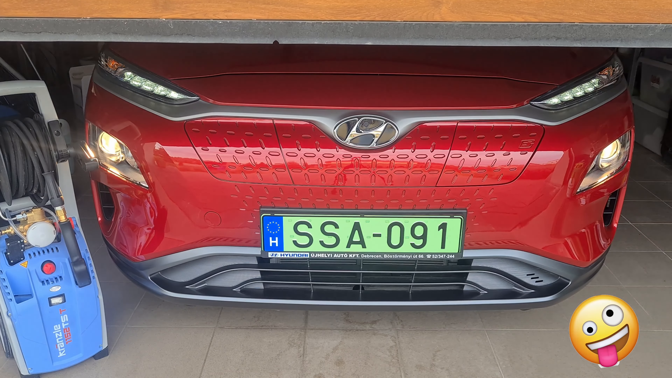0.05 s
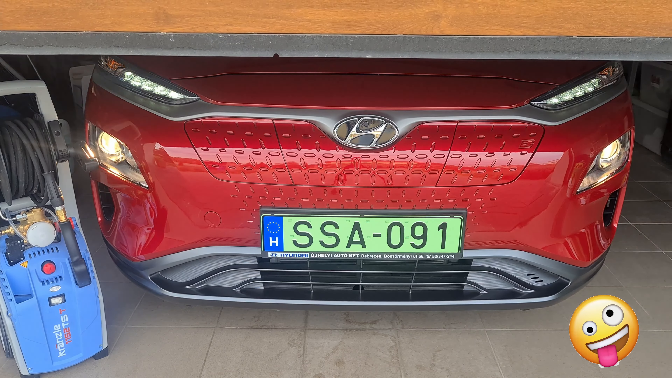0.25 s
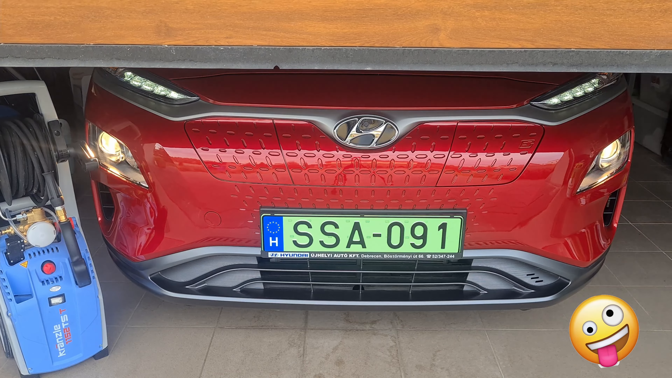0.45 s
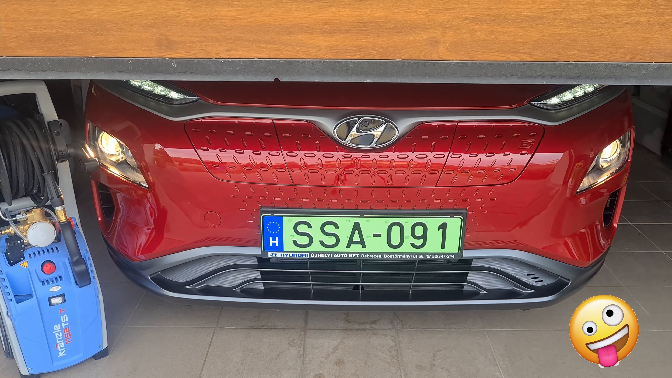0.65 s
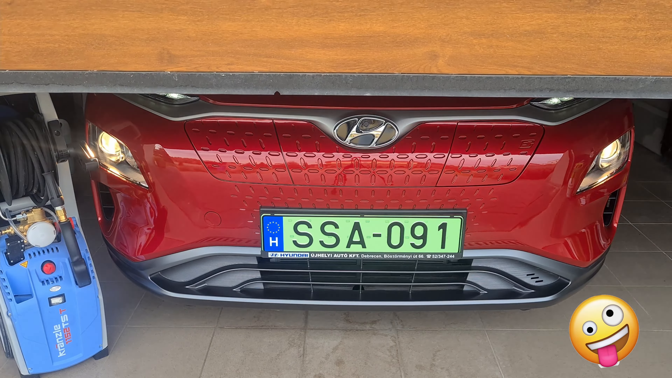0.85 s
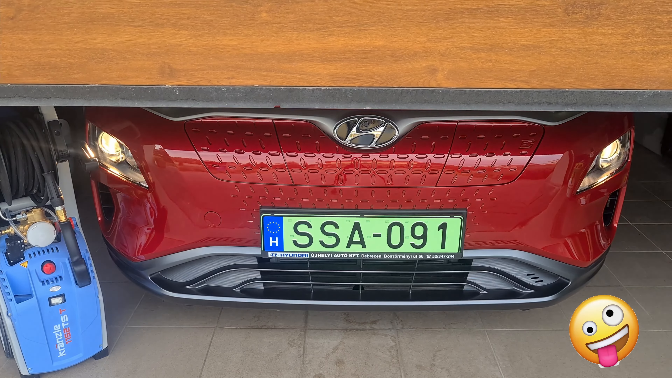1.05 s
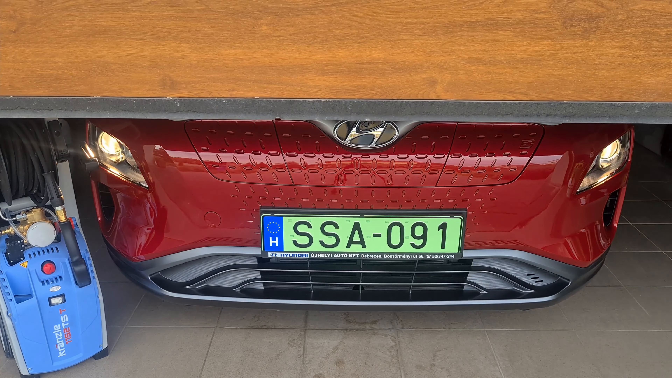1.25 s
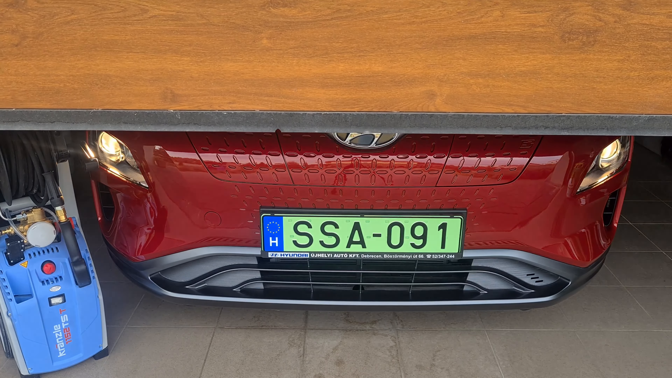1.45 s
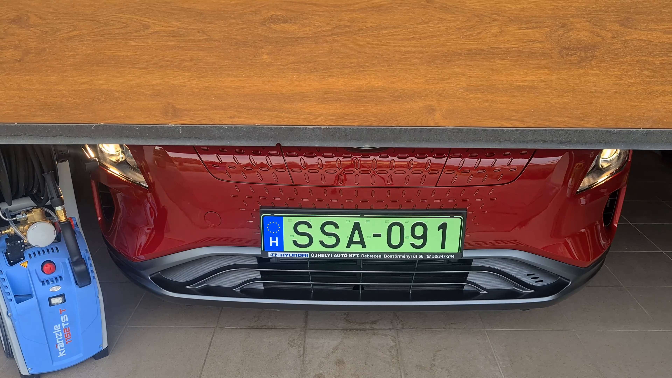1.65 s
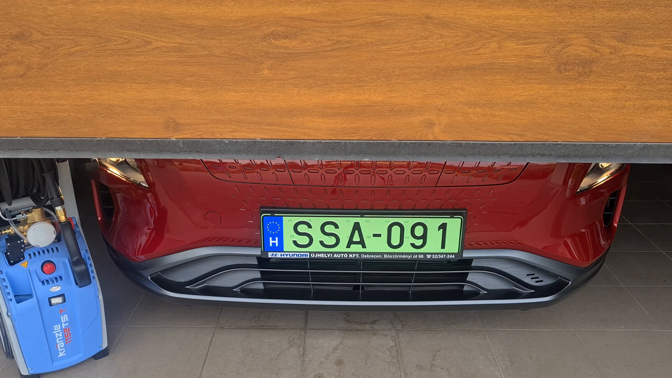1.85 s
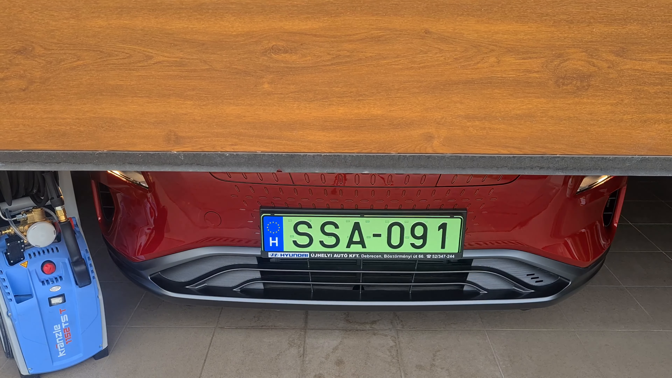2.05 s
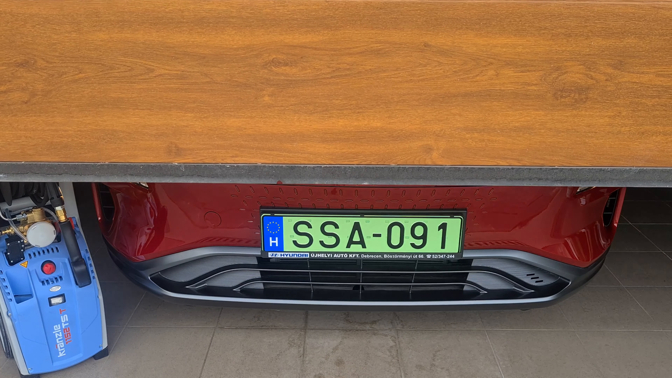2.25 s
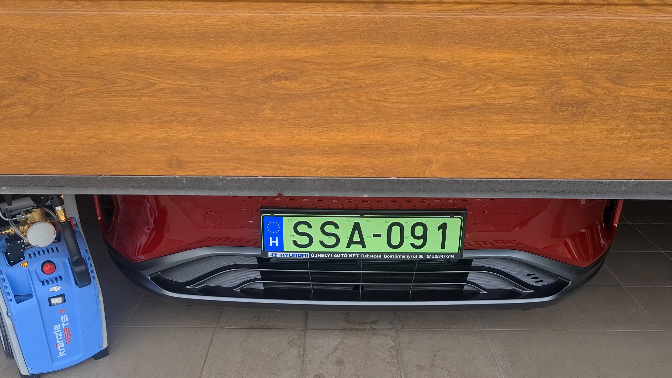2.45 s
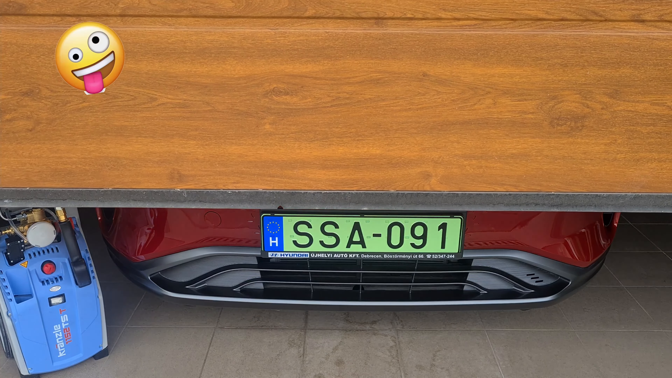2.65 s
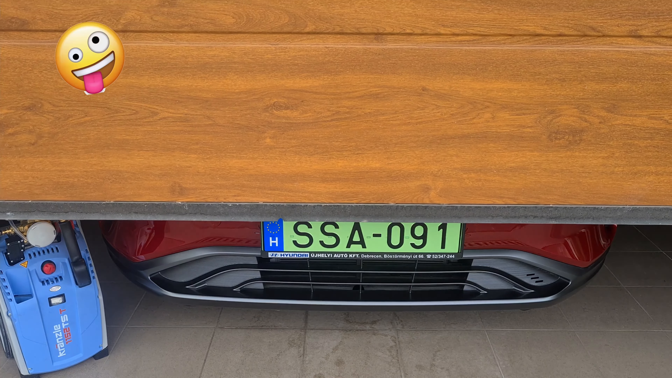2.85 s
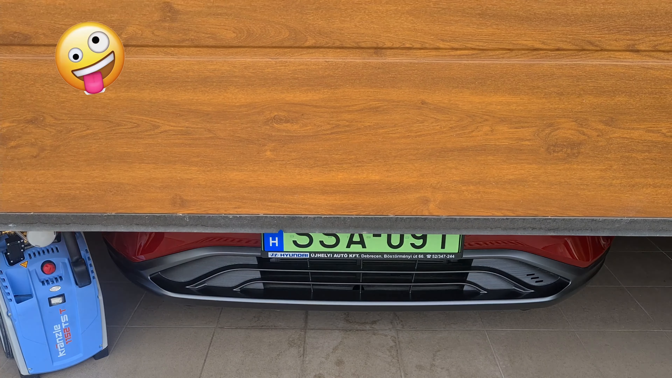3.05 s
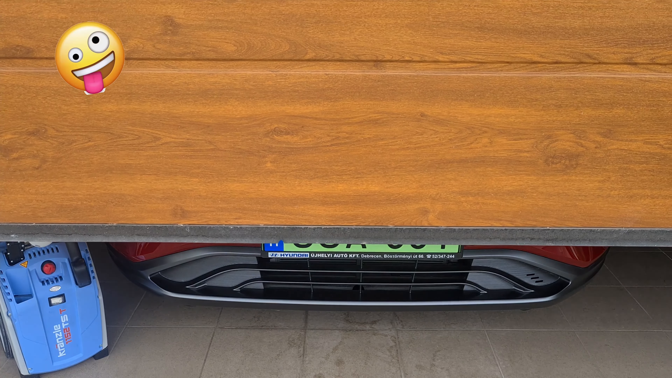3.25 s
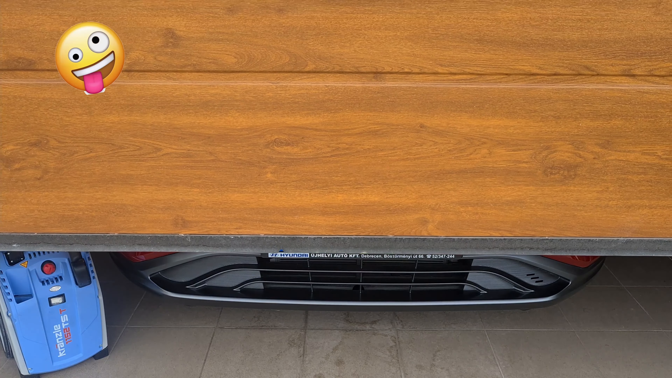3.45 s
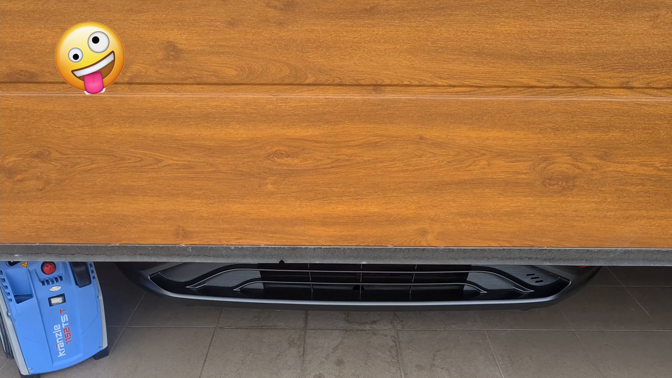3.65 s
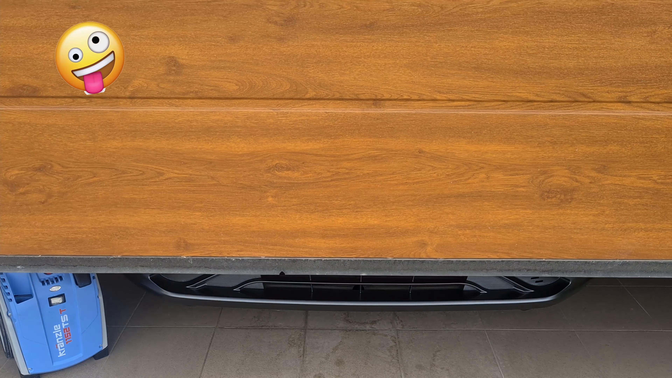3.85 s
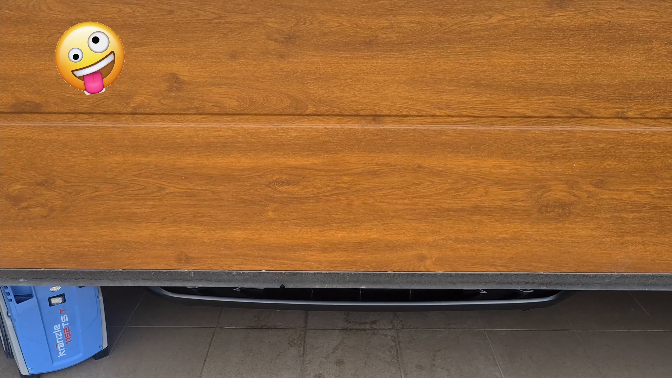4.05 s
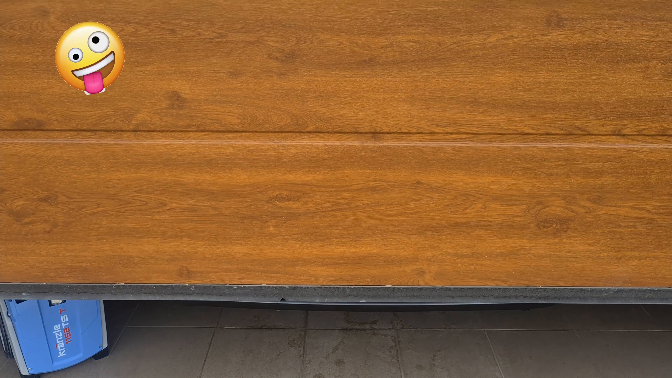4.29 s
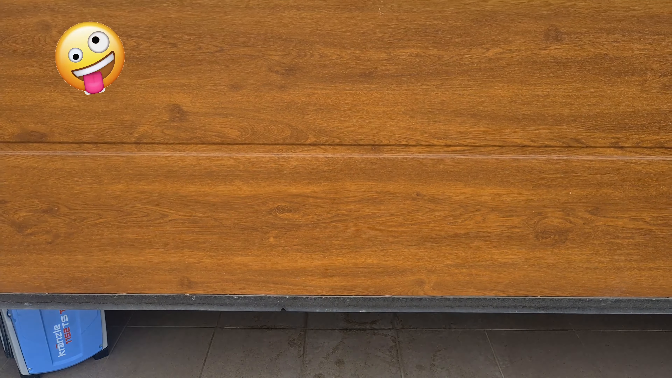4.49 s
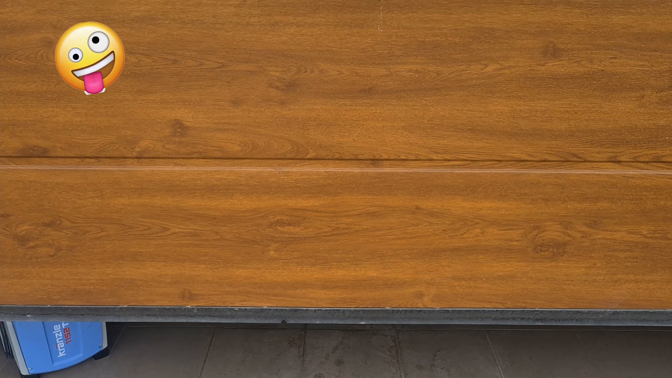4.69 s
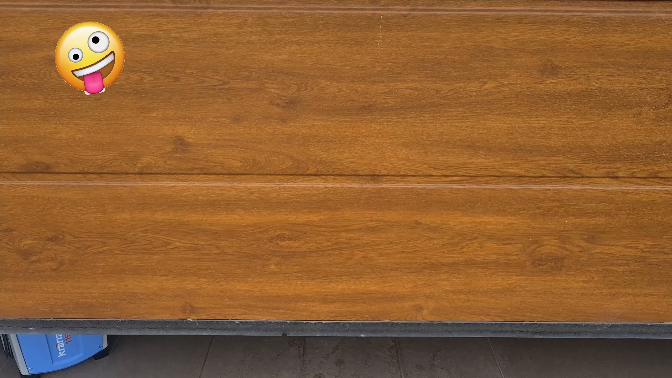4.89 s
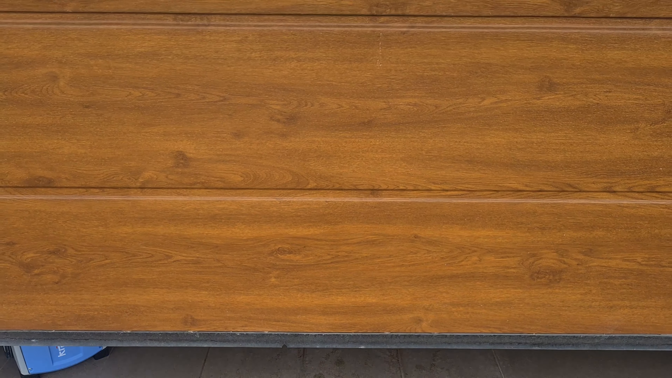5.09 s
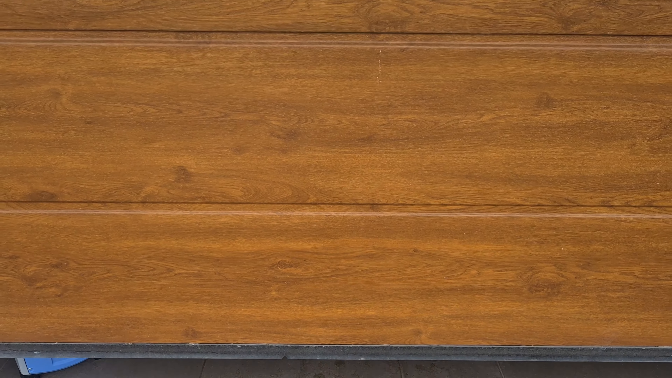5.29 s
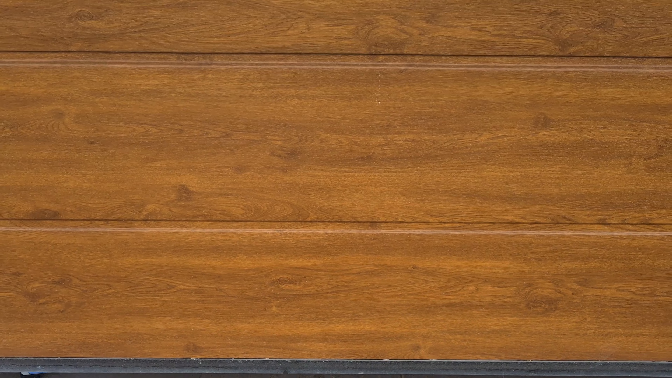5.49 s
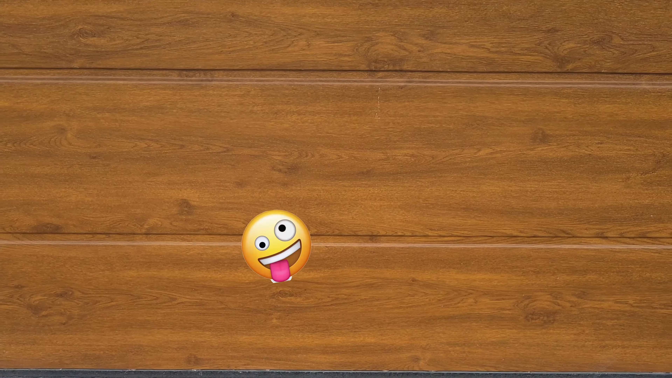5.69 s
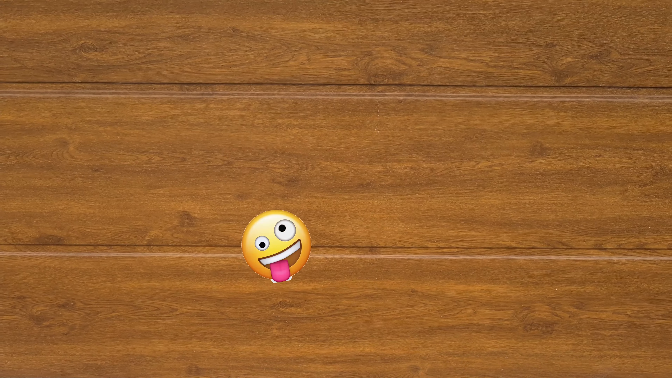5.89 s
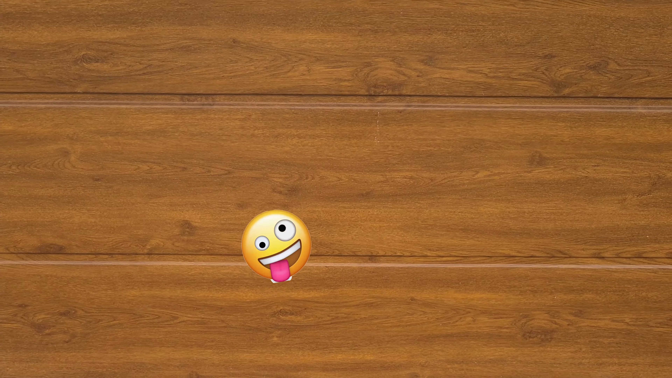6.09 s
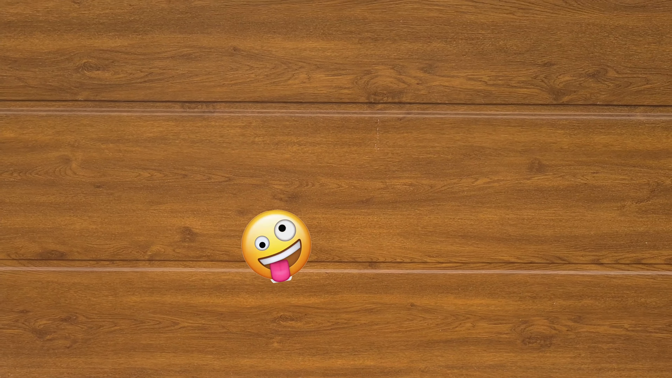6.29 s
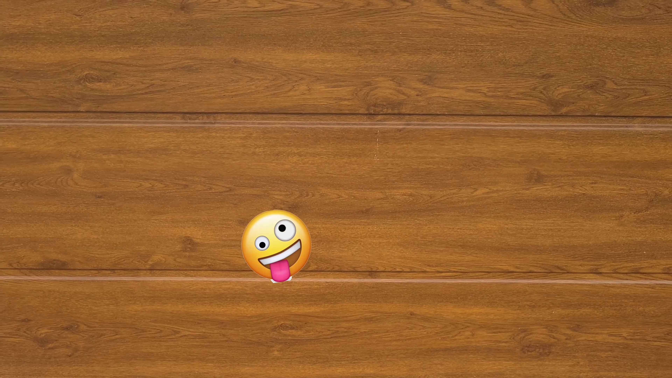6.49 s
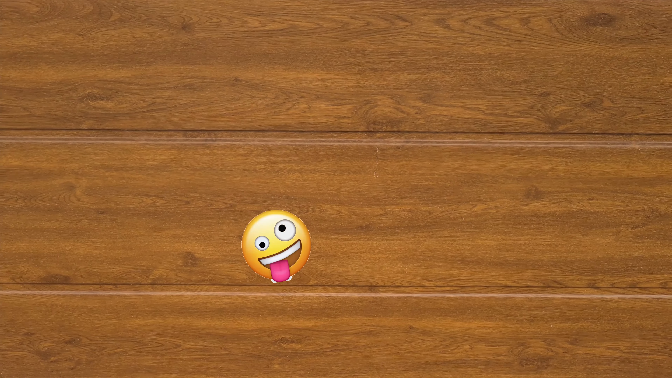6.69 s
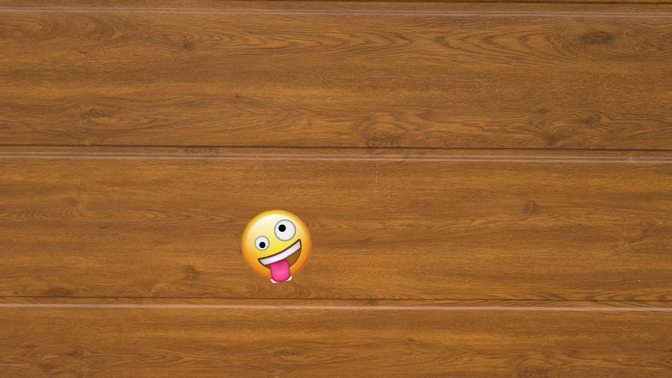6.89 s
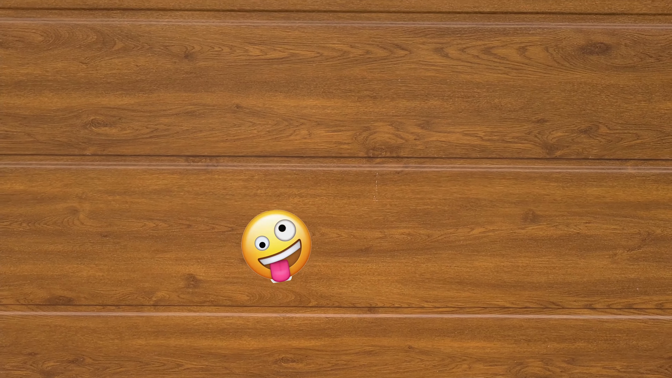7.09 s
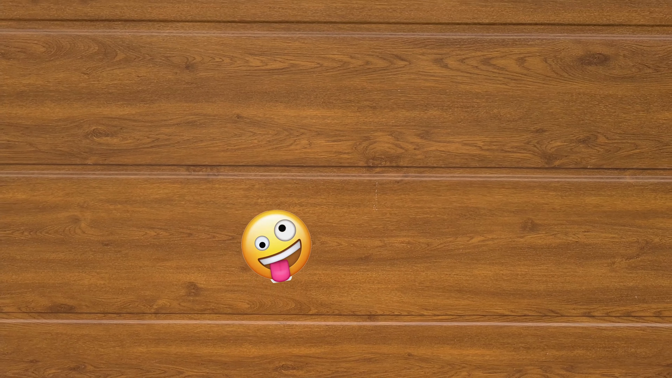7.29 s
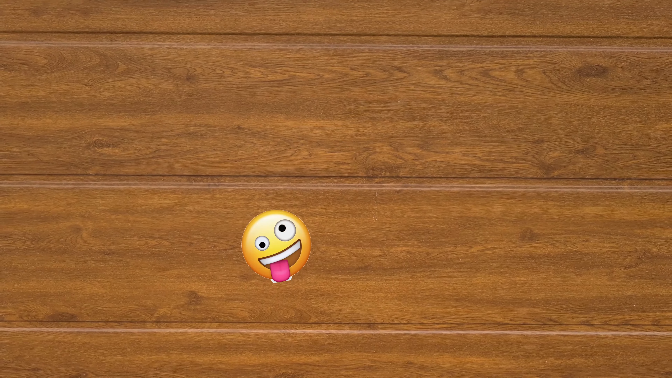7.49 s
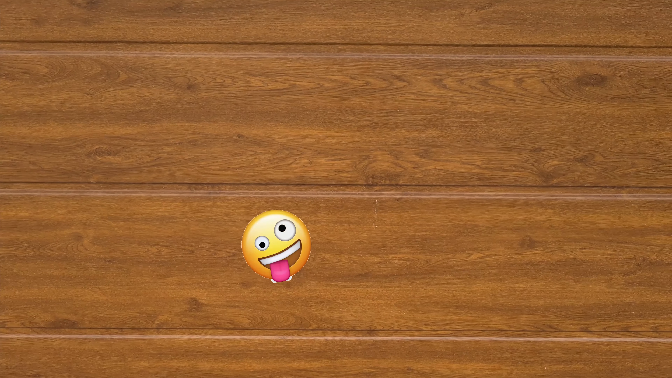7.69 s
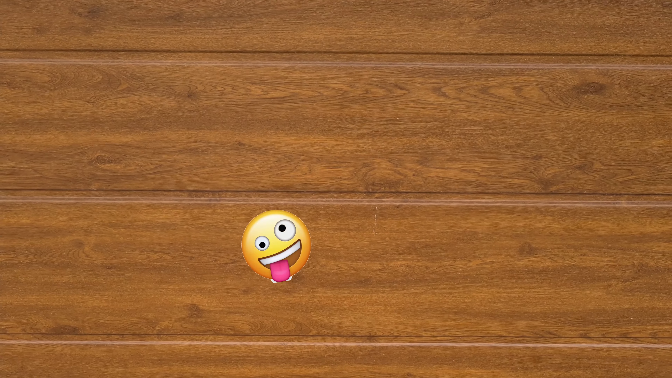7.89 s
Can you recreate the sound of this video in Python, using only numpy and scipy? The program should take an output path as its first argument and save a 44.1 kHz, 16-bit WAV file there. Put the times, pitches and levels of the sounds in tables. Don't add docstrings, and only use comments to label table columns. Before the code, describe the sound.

A continuous motor hum dominates from the first moment, low and rough, its drive teeth passing so fast they fuse into a buzz with a repeating uneven pattern. Light metallic knocking, rumbling door panels and a trace of hiss surround it. Heard outdoors through a handheld microphone near the garage, it keeps its pitch but steadily sinks in level as the door shuts it in.

```python
import sys
import numpy as np
from scipy import signal
from scipy.fft import rfft, irfft, next_fast_len
from scipy.io import wavfile
from scipy.ndimage import map_coordinates

SR = 44100
rng = np.random.default_rng(int(sys.argv[2]) if len(sys.argv) > 2 else 0)


def undo_db(level):
    steps = np.asarray(level, float) / 20
    return 10 ** steps


def store_pcm(level_fs):
    pcm = np.round(np.clip(level_fs, -1, 1) * 32767).astype(np.int16)
    wavfile.write(sys.argv[1], SR, np.atleast_2d(pcm).T)


N = 350154

# t/s, turn rate/(turns/s), level/dB
WHEEL_RUN = [(0.0, 10.799, -14.4), (0.36, 10.819, -14.7), (1.11, 10.688, -15.4), (1.62, 10.683, -17.2),
             (2.32, 10.687, -17.9), (2.68, 10.78, -18.2), (3.41, 10.77, -19.0), (3.48, 10.774, -20.3),
             (3.94, 10.863, -21.8), (4.18, 10.776, -21.5), (5.67, 10.787, -25.0), (6.12, 10.857, -26.2),
             (6.78, 10.821, -27.9), (7.94, 10.839, -30.7)]
TOOTH_PUSHES = [
    (0.011, 1.34, 0.491, 0.58),
    (-0.247, 2.0, 0.488, 1.42),
    (-0.188, 1.28, 0.547, 1.34),
    (-0.351, 0.89, 0.427, 0.75),
    (-0.195, 1.18, 0.525, 0.77),
    (-0.143, 1.36, 0.509, 0.4),
    (-0.233, 1.39, 0.489, 1.04),
    (-0.222, 1.87, 0.518, 1.36),
]
# f/Hz, width/Hz, signed share/1
ENGAGE_MODES = [(225.0, 136.0, 0.553), (235.0, 36.0, 0.5691), (235.0, 90.0, -0.9999), (489.0, 29.0, -0.019),
                (667.0, 39.0, -0.0201), (988.0, 32.0, -0.0024)]
RELEASE_MODES = [(96.0, 137.0, 0.1115), (186.0, 29.0, -0.1743), (249.0, 12.0, -0.2042),
                 (366.0, 123.0, -0.0589), (652.0, 12.0, 0.0819), (938.0, 12.0, 0.0261)]
# clatter/dB, ring/dB, hiss/dB
TOOTH_BURSTS = [
    (0, -5, 0),
    (-4, 0, -1),
    (-3, -10, 0),
    (-7, -12, -9),
    (-3, -2, -2),
    (-5, -7, 0),
    (-5, -8, -3),
    (-7, -9, -6),
]
# f/Hz, density/(dB per Hz)
RUMBLE_SPECTRUM = [(25, -39), (43, -8.5), (60, 8.5), (75, 12), (100, 4), (150, 0.5), (230, 4.5), (300, 3.5),
                   (385, -10.5), (450, 3), (520, 2), (620, 6), (700, -7), (1000, -120)]
CLATTER_SPECTRUM = [(420, -31), (720, -1), (769, -4), (822, -11.5), (918, -7), (1120, -15), (1180, -16),
                    (1390, -15.5), (1620, -25), (1740, -21), (1820, -18.5), (2120, -24), (2700, -37.5),
                    (3510, -70), (5940, -120)]
HISS_SPECTRUM = [(1470, -32), (2500, -4), (3000, 0), (3390, -5), (3720, -4), (4080, -7), (4790, -2),
                 (5760, -3), (6970, -8), (8000, -14), (8770, -13), (10500, -25), (15600, -39)]
# f/Hz, width/Hz, level/dB
RAIL_MODES = [(1792, 68, 0), (1109, 26, 2), (1985, 80, -11), (2245, 50, -15), (2735, 40, -19),
              (4932, 36, -19), (5590, 90, -23), (4460, 40, -24)]
# f/Hz, width/Hz, signed share/1
ARM_MODES = [(766, 25, 1.614), (906, 60, 2.0), (908, 51, -1.653), (1066, 32, 0.204), (1082, 202, -0.115),
             (1258, 41, 0.073), (1394, 34, -0.095)]
TOOTH_OVERTONES = [0, -11, -9.9, -31.2, -17.1, -14.5, -21.1, -32.1]
# multiple of the turn rate/1, level/dB rms
UNEVEN_ORDERS = [(6, -17.3), (13, -23.1), (17, -19.9), (19, -15.5), (20, -27.2), (22, -14.1), (23, -29.3),
                 (25, -14.1), (27, -20.5), (28, -24.4), (29, -25.4), (30, -17.3), (31, -28.4), (33, -28.5),
                 (38, -29.6), (45, -27.4), (46, -23.5), (47, -29.2), (49, -20.7), (50, -22.4), (51, -25.2),
                 (52, -29.7), (54, -22.3), (55, -22.7), (57, -26.6), (58, -28.2), (59, -24.6), (60, -24.6),
                 (61, -28.5), (62, -26.5)]
# f/Hz, level/dB rms
FAINT_ORDERS = [(43, -40), (75, -33), (97, -49), (135, -31), (370, -40), (383, -47), (470, -34), (710, -40)]
ARM_KNOCKS = [
    (0.391, 2.0),
    (0.331, 0.92),
    (0.458, 0.99),
    (0.4, 0.9),
    (0.414, 1.06),
    (0.221, 0.76),
    (0.408, 0.26),
    (0.311, 0.42),
]
RATTLE_DB, RATTLE_DB_PER_S = -0.2, 0.29
UPPER_DB, UPPER_DB_PER_S = -1.41, 0.3481
LEAD_DEG, LEAD_DEG_PER_S = 1.05, -0.3
TEETH_COUNT = len(TOOTH_PUSHES)


def unit(x):
    return x / np.sqrt(np.mean(x ** 2) + 1e-20)


def curves(rows):
    s, *cols = np.transpose(rows)
    return [np.interp(np.arange(N) / SR, s, c) for c in cols]


def wobble(rate, step=1):
    knots = rng.standard_normal(int(N * rate / SR) + 4)
    return map_coordinates(knots, [np.arange(0, N, step) * rate / SR])


def filtered(x, response):
    m = next_fast_len(N + SR // 2)
    return irfft(rfft(x, m) * response(np.fft.rfftfreq(m, 1 / SR)), m)[..., :N]


def resonance(modes, f):
    return sum(g * 1j * f * w / (c * c - f * f + 1j * f * w) for c, w, g in modes)


def coloured(x, spectrum):
    f, level = np.transpose(spectrum)
    return unit(filtered(x, lambda hz: undo_db(np.interp(np.log(hz + 1), np.log(f), level))))


def passing_teeth(turns):
    return np.arange(int(turns[-1] * TEETH_COUNT))


def bursts(turns, column, delay, scatter_db, decay_s, rest):
    tooth = passing_teeth(turns)
    burst_db = np.transpose(TOOTH_BURSTS)[column][tooth % TEETH_COUNT]
    burst_db = burst_db + scatter_db * rng.standard_normal(len(tooth))
    kicks = np.zeros(N + 1)
    kicks[np.searchsorted(turns, (tooth + delay) / TEETH_COUNT)] = undo_db(burst_db)
    t = np.arange(SR // 10) / SR
    return rest + signal.fftconvolve(kicks, np.exp(-t / decay_s))[:N]


def panel_rumble():
    return undo_db(1.2 * wobble(6)) * coloured(rng.standard_normal(N), RUMBLE_SPECTRUM)


def tooth_hiss(turns):
    puffs = bursts(turns, column=2, delay=0.48, scatter_db=3.0, decay_s=0.0059, rest=0.78)
    return undo_db(0.43 * wobble(7)) * coloured(rng.standard_normal(N) * puffs, HISS_SPECTRUM)


def rail_clatter(turns):
    shakes = bursts(turns, column=0, delay=0.48, scatter_db=1.3, decay_s=0.0028, rest=0.76)
    return coloured(rng.standard_normal(N) * shakes, CLATTER_SPECTRUM)


def rail_ring(turns):
    strikes = bursts(turns, column=1, delay=0.1, scatter_db=2.5, decay_s=0.003, rest=0.1)

    def rail(f):
        return sum(undo_db(db) * resonance([(c, w, 1)], f) ** 2 for c, w, db in RAIL_MODES)

    return unit(filtered(rng.standard_normal(N) * strikes, rail))


def rattle(turns):
    door = undo_db(-14) * panel_rumble() + undo_db(-44.5) * tooth_hiss(turns)
    return door + undo_db(-28) * rail_clatter(turns) + undo_db(-37) * rail_ring(turns)


def knocks(turns, scatter_db, scatter_pitch):
    tooth = passing_teeth(turns)
    delay, push = np.transpose(ARM_KNOCKS)[:, tooth % TEETH_COUNT]
    chance = rng.standard_normal((len(tooth), 2))
    struck_at = (tooth + delay + scatter_pitch * chance[:, 0]) / TEETH_COUNT
    blows = np.zeros(N + 1)
    blows[np.searchsorted(turns, struck_at)] = push * undo_db(scatter_db * chance[:, 1])

    def arm(f):
        return sum(g * resonance([(c, w, 1)], f) ** 2 for c, w, g in ARM_MODES)

    return filtered(blows[:N], arm)


def shaft(rate_hz):
    order = np.arange(4, 67)
    strong = dict(UNEVEN_ORDERS)
    for k, db in enumerate(TOOTH_OVERTONES):
        strong[(k + 1) * TEETH_COUNT] = db
    hz, faint_db = np.transpose(FAINT_ORDERS)
    rest_db = np.interp(np.log(order * rate_hz), np.log(hz), faint_db)
    return order, np.array([strong.get(k, db) for k, db in zip(order, rest_db)])


def shaft_phases(order, rate_hz):
    engage_at, engage, release_at, release = np.transpose(TOOTH_PUSHES)[:, :, None]
    slot = np.arange(TEETH_COUNT)[:, None]

    def one_turn(at, push):
        return (push * np.exp(-2j * np.pi * order * (slot + at) / TEETH_COUNT)).sum(0)

    hz = order * rate_hz
    engaging = one_turn(engage_at, engage) * resonance(ENGAGE_MODES, hz)
    releasing = one_turn(release_at, release) * resonance(RELEASE_MODES, hz)
    return np.angle(engaging + releasing)


def drone(turns, gap, upper_db, rate):
    order, level_db = shaft(rate.mean())
    step = 16
    out = 0
    for k, db, phase in zip(order, level_db, shaft_phases(order, rate.mean())):
        order_db = db + 0.014 * k * wobble(1.2, step)
        path = turns
        if k > TEETH_COUNT:
            order_db = order_db + upper_db[::step]
            path = gap
        out = out + undo_db(order_db) * np.cos(2 * np.pi * k * path[::step] + phase)
    padded = np.pad(out, 50, "reflect")
    full = signal.resample_poly(padded, step, 1, window=("kaiser", 12))
    return np.sqrt(2) * full[50 * step:][:N]


def scene():
    rate, level_db = curves(WHEEL_RUN)
    t = np.arange(N) / SR
    rattle_db = RATTLE_DB + RATTLE_DB_PER_S * t
    upper_db = UPPER_DB + UPPER_DB_PER_S * t
    turns = np.cumsum(rate) / SR + 0.0007 * wobble(6)
    gap = turns + (LEAD_DEG + LEAD_DEG_PER_S * t) / 360
    noise = undo_db(rattle_db) * rattle(gap)
    knock = undo_db(27.5 + upper_db) * knocks(gap, scatter_db=1.5, scatter_pitch=0.004)
    drive = noise + knock + drone(turns, gap, upper_db, rate)
    return (undo_db(level_db) * drive)[None]


def low_pass(x):
    return signal.sosfilt(signal.butter(12, 15710, fs=SR, output="sos"), x)


def record(dry):
    return low_pass(dry)


dry = scene()
out = record(dry)
store_pcm(out)
```